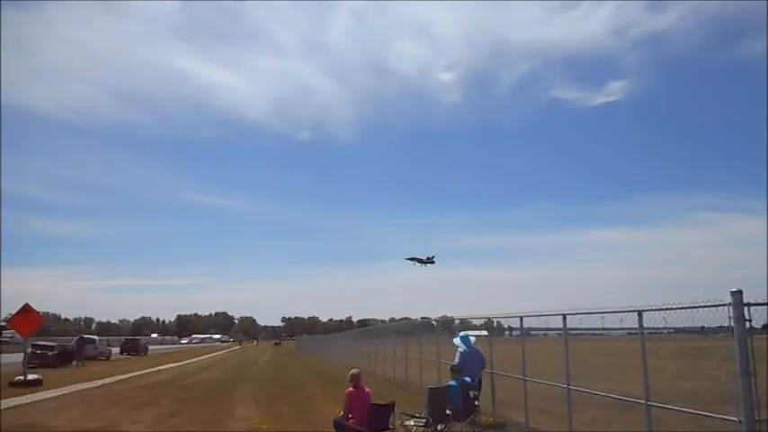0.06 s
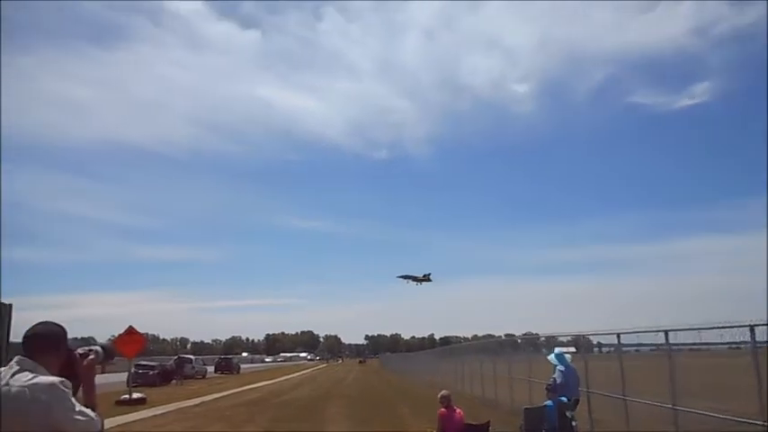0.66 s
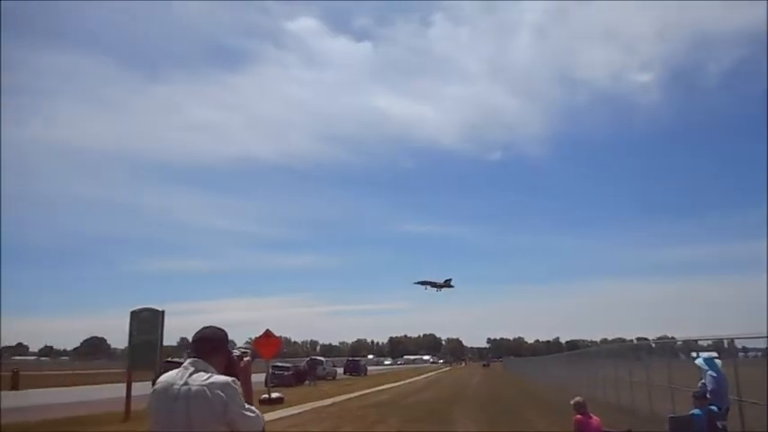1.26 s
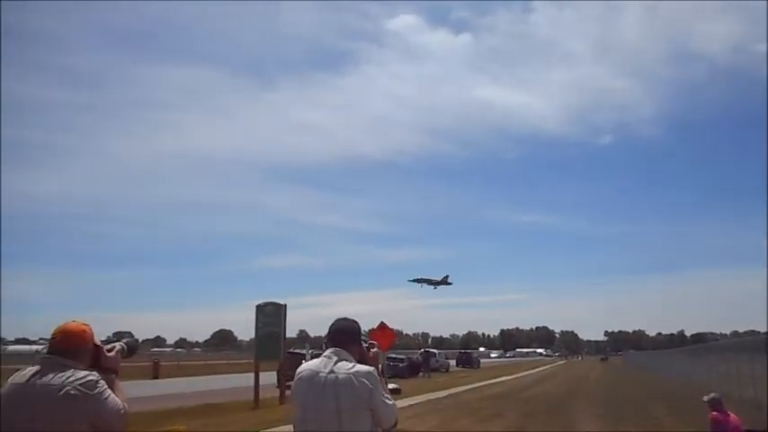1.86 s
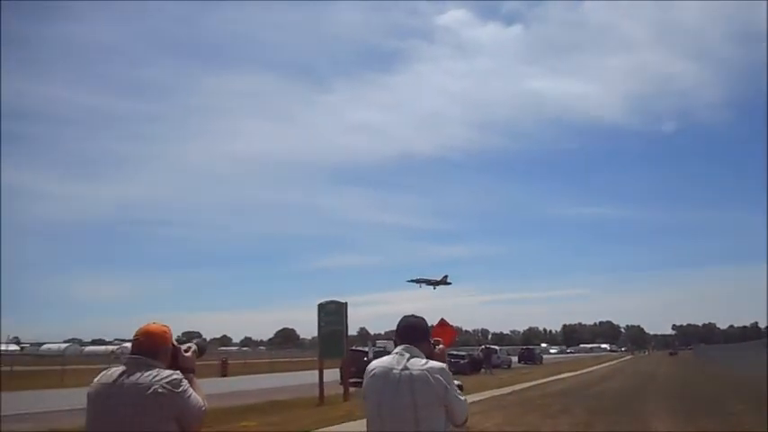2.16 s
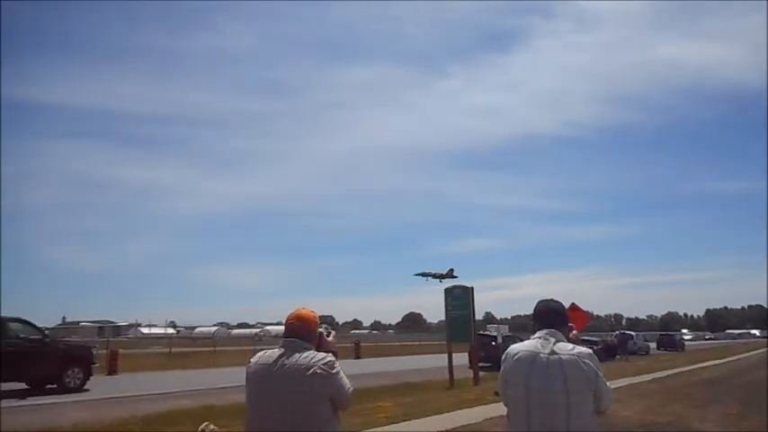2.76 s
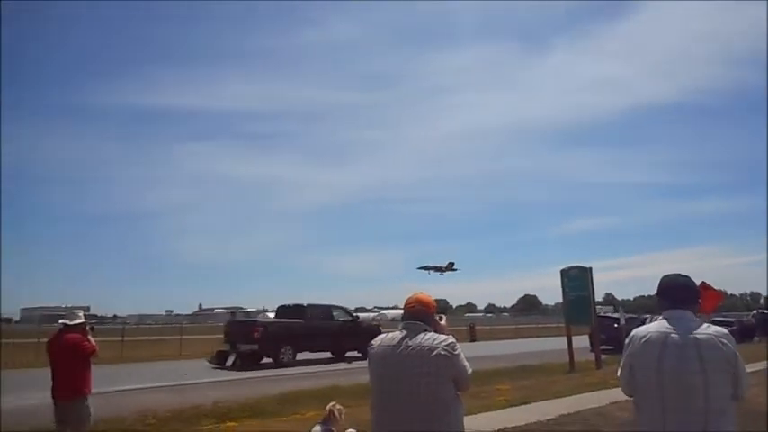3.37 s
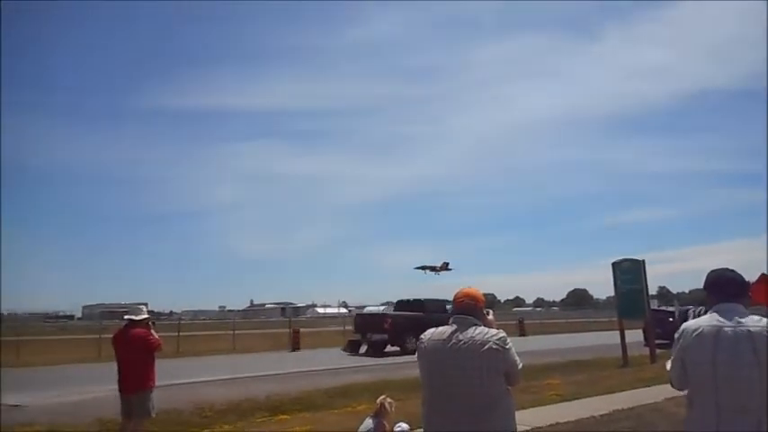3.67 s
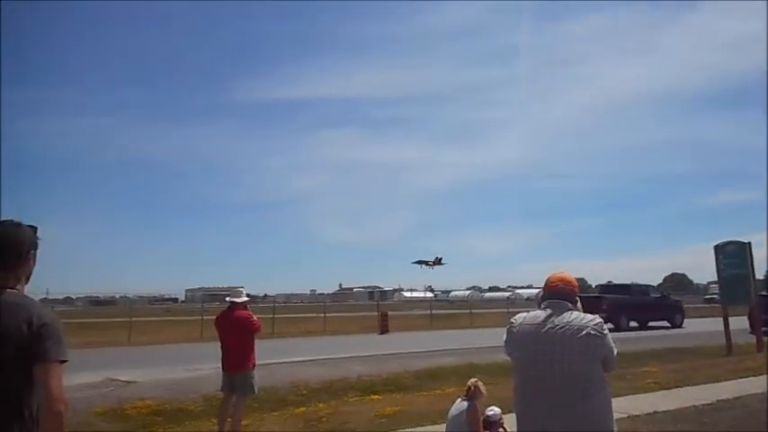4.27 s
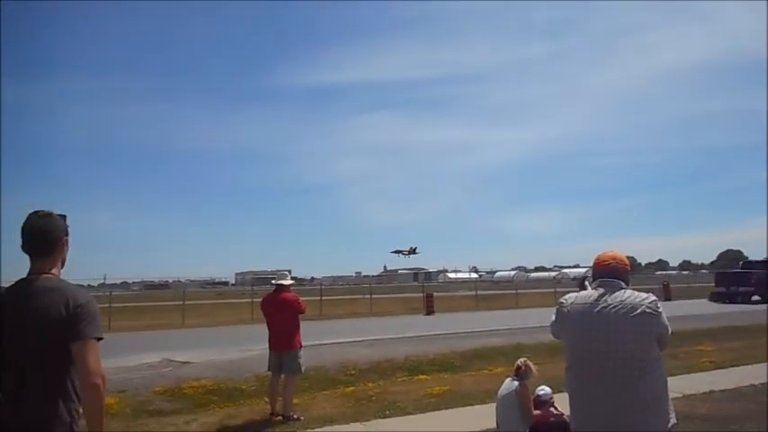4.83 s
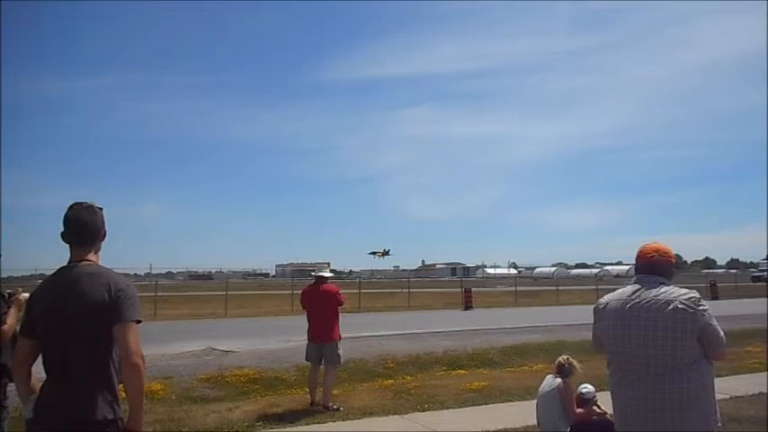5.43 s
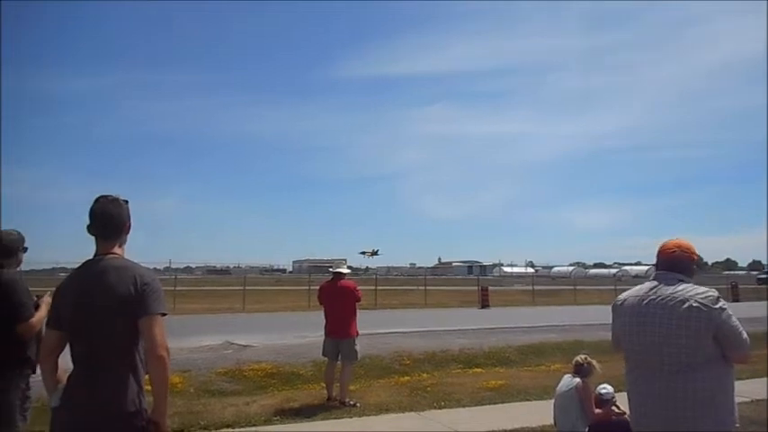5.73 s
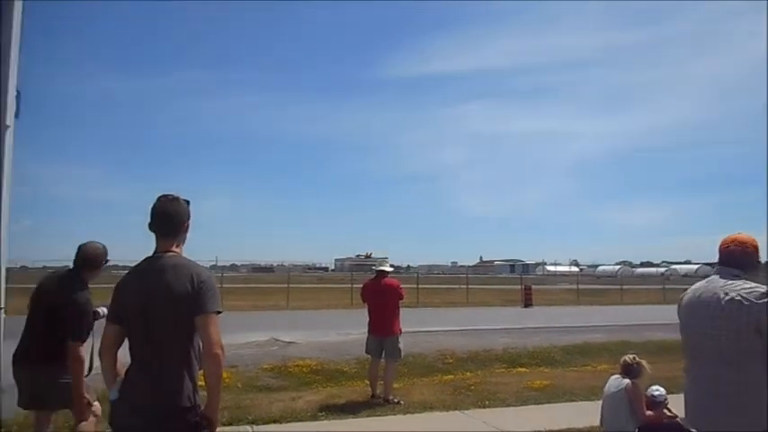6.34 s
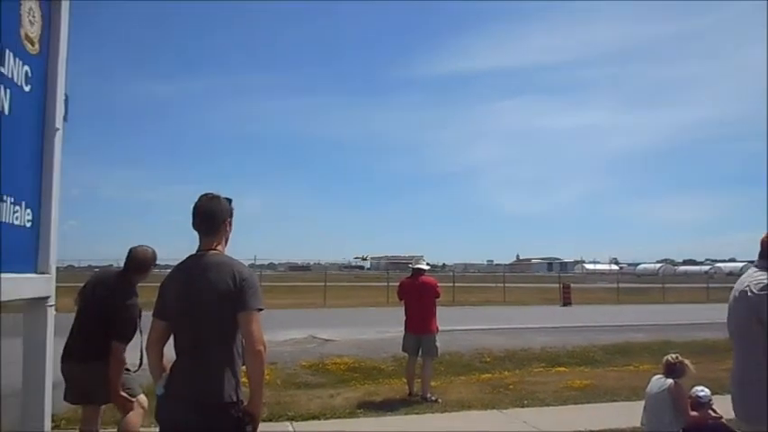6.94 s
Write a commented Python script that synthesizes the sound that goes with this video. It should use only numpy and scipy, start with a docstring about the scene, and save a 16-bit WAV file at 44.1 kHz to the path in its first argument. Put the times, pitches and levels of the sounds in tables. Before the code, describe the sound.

Heard outdoors through a small camera microphone, a fighter jet approaches low over an airfield with a thin rising whine and a growing, wavering roar. The roar stays loud as it goes by, joined by swells of low rumble and a short high whistle. It takes on a rising, sweeping whoosh and softens slightly as the jet draws away. Occasional soft wind thumps touch the microphone.

```python
"""A fighter jet flies low along an airfield, heard from the grass with a small camera.
First its compressor whines, climbing as it spools up. The exhaust's mixing noise swells to a roar,
fluttering in turbulent air; the jet is abeam at 2.6 s. A low rumble swells, the turbine whistles
briefly, and the ground echo sweeps a comb upward through the roar as the jet draws away.
Throughout, a light breeze bumps the microphone now and then."""
import sys
import numpy as np
from scipy.fft import rfft, irfft, next_fast_len
from scipy.io import wavfile
from scipy.ndimage import map_coordinates

SR = 44100
rng = np.random.default_rng(int(sys.argv[2]) if len(sys.argv) > 2 else 0)


def waveform_to_disk(signal):
    """Save audio, clipped to [-1, 1], as 16-bit WAV at the path in sys.argv[1]."""
    frames = np.transpose(np.atleast_2d(signal))
    scaled = np.clip(frames, -1, 1) * 32767
    samples = np.round(scaled).astype(np.int16)
    wavfile.write(sys.argv[1], SR, samples)


N = 308700

# camera hiss: (frequency [Hz], density [dB])
SELF_NOISE_SPECTRUM = [(1000, -1), (5000, -0.5), (8000, -7.5), (9500, -13.5), (10300, -26)]
# microphone port peaks and notches: (centre [Hz], width [Hz], gain [dB])
PORT_RESONANCES = [(347.5, 17, 5), (395, 17, 1.5), (478.3, 43, 4.5), (644, 20, 4), (694, 11, -8),
                   (783, 99, 1.5), (995, 7.5, 6.5), (1123, 82, -2), (1268, 71, 2.5), (1610, 120, 2),
                   (1753, 130, -3), (2570, 120, -4.5), (3033, 260, 2.5), (3443, 150, -3.5), (4080, 400, 3),
                   (4585, 280, -6), (5150, 360, 0.5)]
# wind rumble: (frequency [Hz], density [dB])
BREEZE_SPECTRUM = [(20, 0.5), (70, 1), (130, -6.5), (300, -25), (1000, -76.5)]
# gusts: (time [s], gain [dB], half length [s])
BREEZE_GUSTS = [(1.45, 4, 0.072), (4.35, 11, .09), (6.63, 6, 0.17)]
# single eddies on the diaphragm: (time [s], peak [dB], pitch [Hz])
BREEZE_BUMPS = [(0.741, -47, 190), (1.108, -34.5, 220), (2.672, -40, 119.4), (3.061, -34, 210),
                (3.562, -29.5, 250), (4.264, -37, 90), (4.296, -26.5, 109), (4.344, -32, 120),
                (4.358, -30, 151), (4.386, -35, 110), (4.441, -36, 170), (5.768, -22.5, 290),
                (6.571, -28, 340), (6.579, -37, 70), (6.634, -34, 170)]
# low rumble swells: (time [s], gain [dB], half length [s])
RUMBLE_SWELLS = [(3.3, 17, 0.32), (5.75, 13.6, 0.63), (6.9, 7.5, 0.17)]
# compressor whine, beamed forwards: (time [s], level [dB])
COMPRESSOR_LEVEL = [(0, -60), (.2, -57), (.35, -68), (.8, -70), (1.5, -51.5), (1.9, -60.5), (4, -81.5),
                    (7, -99)]
# reflection off grass: (frequency [Hz], gain [dB], phase lag [rad])
GRASS_REFLECTION = [(200, 1, -.45), (700, 0, -.4), (1500, 0, -.25), (2100, -.5, .55), (2800, -6, .6),
                    (3800, -15, 1.3), (8000, -30, 1.5)]
# exhaust noise before band levelling: (frequency [Hz], density [dB])
PLUME_SPECTRUM = [(40, -43), (120, -23), (220, -23), (420, -12.5), (590, -4.5), (900, -2), (1400, 2.5),
                  (2100, -1.5), (3200, -7), (4800, -22.5), (6500, -31), (7400, -42.5), (8200, -59),
                  (10000, -80.5)]
# base level of the arriving roar: (time [s], level [dB])
ROAR_LEVEL = [(-0.0, -35), (0.27, -32), (0.66, -31), (0.99, -33), (1.41, -25.5), (2.36, -20.5), (3.73, -23),
              (3.97, -19.5), (5.19, -21), (5.87, -19.5), (6.26, -24), (6.68, -29.5), (7.0, -25)]
# eddy sizes, as rumble, body, howl, rasp, hiss, fizz: (low edge [Hz], high edge [Hz])
EDDY_BANDS = [(280, 480), (560, 1050), (1180, 1620), (1760, 2450), (2800, 4400), (5000, 7500)]
# beam per eddy band: (gain abeam [dB], extra gain tail on [dB])
EDDY_BEAMS = [(-24, -3), (-5.5, -0.2), (-3.0, 0.5), (-5, -2.5), (-9, -3.5), (-21.5, -3.5)]
# turbulent air focusing or shading the roar: (time [s], gain [dB], half length [s], centre [Hz])
AIR_SURGES = [(0.154, 11, 0.026, 2900), (0.258, 6, 0.039, 1060.0), (0.505, 5.5, 0.027, 1710.0),
              (0.658, 7, 0.17, 940.0), (1.278, 10.5, 0.08, 1040), (1.514, 7, 0.11, 4450),
              (1.566, 8.5, 0.1, 1110), (1.725, 8.5, 0.015, 1190.0), (1.838, 5.5, 0.14, 2260),
              (2.054, 4.3, 0.081, 960.0), (2.252, 5.5, 0.034, 2290), (2.384, 9, 0.017, 1130),
              (2.42, 5, 0.059, 2660), (2.577, -6, 0.1, 2670), (2.664, 6.5, 0.12, 4080),
              (2.932, 7, 0.061, 4200), (3.33, 3.8, 0.21, 1610), (3.414, 7.5, 0.069, 516),
              (3.633, 9.5, 0.31, 4510), (3.694, 8, 0.029, 4150), (4.116, 7, 0.04, 3980.0),
              (4.303, 3.5, 1, 405), (4.675, 6.5, 0.059, 940), (4.675, 10.5, 0.028, 4550.0),
              (4.876, 4, 0.083, 1250.0), (5.067, 6, 0.068, 4750), (5.229, 5.0, 0.25, 2000),
              (5.607, 5, 0.055, 1210.0), (5.96, 3.5, 0.27, 1350), (6.198, 5.5, 0.13, 3140),
              (6.94, 5.5, 0.439, 4080)]

ABEAM_S, PASS_S = 2.636, 2.67  # PASS_S: time to fly one closest distance


def amp(db):
    """Decibels to gain."""
    return 10 ** (np.asarray(db) / 20)


def unit(x):
    """Scale to rms 1."""
    return x / np.sqrt(np.mean(x ** 2) + 1e-20)


def seconds():
    """Time of each sample."""
    return np.arange(N) / SR


def envelope_db(rows):
    """(time, level) points joined per sample."""
    return np.interp(seconds(), *np.transpose(rows))


def swell(time_s, half_s):
    """Gaussian rise to 1 and back."""
    return np.exp(-np.minimum(((seconds() - time_s) / half_s) ** 2, 20))


def swells_db(rows):
    """Sum of (time, gain, half length) swells."""
    return sum(db * swell(time_s, half_s) for time_s, db, half_s in rows)


def wobble(rate_hz):
    """Smooth random curve, rate_hz knots a second."""
    knots = rng.standard_normal(int(N * rate_hz / SR) + 4)
    return map_coordinates(knots, [np.arange(N) * rate_hz / SR])


def filtered(x, response):
    """Apply a frequency response."""
    size = next_fast_len(N + SR // 2)
    return irfft(rfft(x, size) * response(np.fft.rfftfreq(size, 1 / SR)), size)[:N]


def shaped(x, spectrum):
    """Filter by (frequency, dB) points joined on a log axis."""
    knots_hz, db = np.transpose(spectrum)
    return filtered(x, lambda hz: amp(np.interp(np.log(hz + 1), np.log(knots_hz + 1), db)))


def noise(spectrum):
    """Coloured noise, rms 1."""
    return unit(shaped(rng.standard_normal(N), spectrum))


def narrow_noise(hz, width_hz):
    """Noise around a steady or moving pitch, rms 1."""
    phase = 2 * np.pi * np.cumsum(hz * np.ones(N)) / SR
    return unit(wobble(width_hz) * np.cos(phase) + wobble(width_hz) * np.sin(phase))


def port_gain(hz):
    """Resonances of the microphone port."""
    return amp(sum(db * np.exp(-2 * ((hz - centre_hz) / width_hz) ** 2)
                   for centre_hz, width_hz, db in PORT_RESONANCES))


def breeze(base_db, uneven_db):
    """Faint gusty rumble; single eddies push and pull the diaphragm once."""
    out = noise(BREEZE_SPECTRUM) * amp(base_db + swells_db(BREEZE_GUSTS) + uneven_db * wobble(7.5))
    for time_s, peak_db, hz in BREEZE_BUMPS:
        phase = 2 * np.pi * hz * (seconds() - time_s)
        out += amp(peak_db) * phase * np.exp((1 - phase ** 2) / 2)
    return out


def field_rumble(base_db, pitch_hz):
    """Dull rumble that swells a few times once the jet has passed."""
    band = narrow_noise(pitch_hz, width_hz=115)
    return amp(base_db + swells_db(RUMBLE_SWELLS) + 1.4 * wobble(3.8)) * band


def blade_tone(hz, db, width_hz):
    """Tone smeared by the air into a wavering noise band."""
    return amp(db + 1.8 * wobble(12)) * narrow_noise(hz, width_hz)


def compressor(from_hz, to_hz, spool_s):
    """Intake whine: climbs as the engines spool up, fades as the nose passes."""
    hz = to_hz + (from_hz - to_hz) * np.exp(-seconds() / spool_s)
    return blade_tone(hz, envelope_db(COMPRESSOR_LEVEL), width_hz=750)


def turbine(peak_s, peak_db, pitch_hz, sag_hz_per_s=180, rise_db_per_s=44, fade_db_per_s=15):
    """Short sagging whistle, beamed backwards, as the nozzles turn to the listener."""
    since_s = seconds() - peak_s
    db = peak_db + np.minimum(rise_db_per_s * since_s, -fade_db_per_s * since_s)
    return blade_tone(pitch_hz - sag_hz_per_s * since_s, db, width_hz=220)


def flight():
    """Straight pass: distance [closest distances], aspect [-1 nose on, 1 tail on]."""
    travelled = (seconds() - ABEAM_S) / PASS_S
    distance = np.hypot(1, travelled)
    return distance, travelled / distance


def ground_echo(x, abeam_lag_ms, cleanest_s):
    """Bounce off the grass; its lag shrinks as the jet nears the horizon, sweeping a comb upward."""
    distance, _ = flight()
    lag_ms = abeam_lag_ms / distance ** 2
    strength = 0.16 + 0.48 * swell(cleanest_s, half_s=0.95)  # weak at steep angles
    grass_hz, gain_db, lag_rad = np.transpose(GRASS_REFLECTION)
    reflection = lambda hz: amp(np.interp(hz, grass_hz, gain_db))
    bounce = filtered(x, lambda hz: reflection(hz) * np.exp(-1j * np.interp(hz, grass_hz, lag_rad)))
    echo = map_coordinates(bounce, [np.arange(N) - lag_ms * SR / 1000])
    # both paths share the power where the grass reflects
    shared = filtered(x, lambda hz: reflection(hz) ** 2)
    direct_gain = 1 / np.sqrt(1 + strength ** 2)
    return x - (1 - direct_gain) * shared + direct_gain * strength * echo


def air_loss_db(hz, distance):
    """Absorption beyond the closest distance; grows as a power of frequency."""
    return 1.87 * (hz / 1000) ** 1.276 * (distance - 1)


def air_surge_db(hz, half_width_oct=0.68):
    """Turbulent air briefly focuses or shades the sound near hz."""
    return sum(db * swell(time_s, half_s) * np.exp(-(np.log2(hz / centre_hz) / half_width_oct) ** 2)
               for time_s, db, half_s, centre_hz in AIR_SURGES)


def mixing_noise(shocks_per_s, shock_db):
    """Turbulent mixing noise with a crackle of small shocks."""
    shocks = (rng.random(N) < shocks_per_s / SR) * rng.random(N)
    return unit(rng.standard_normal(N) + amp(shock_db) * unit(shocks))


def exhaust(common_flutter_db, band_flutter_db):
    """Big eddies rumble, small ones hiss; each size has its own beam, air loss, surges and flutter."""
    distance, aspect = flight()
    roar_db = envelope_db(ROAR_LEVEL) + common_flutter_db * wobble(70)
    plume = shaped(mixing_noise(shocks_per_s=700, shock_db=-11), PLUME_SPECTRUM)
    out = np.zeros(N)
    for k, ((low_hz, high_hz), (abeam_db, tail_db)) in enumerate(zip(EDDY_BANDS, EDDY_BEAMS)):
        centre_hz = np.sqrt(low_hz * high_hz)
        share = np.repeat(np.arange(len(EDDY_BANDS)) == k, 2)  # neighbouring bands crossfade
        band = filtered(plume, lambda hz: np.interp(hz, np.ravel(EDDY_BANDS), share))
        through_port = filtered(plume, lambda hz: port_gain(hz) * (hz > low_hz) * (hz < high_hz))
        beam_db = abeam_db + tail_db * aspect
        air_db = air_surge_db(centre_hz) - air_loss_db(centre_hz, distance)
        flutter_db = band_flutter_db * wobble(30)
        out += band / np.std(through_port) * amp(roar_db + beam_db + air_db + flutter_db)
    return out


def scene():
    """Jet over grass, breeze at the microphone; mono."""
    roar = exhaust(common_flutter_db=0.94, band_flutter_db=0.97)
    mix = ground_echo(roar, abeam_lag_ms=5.585, cleanest_s=5.15)
    mix += compressor(from_hz=5380, to_hz=7050, spool_s=1.1)
    mix += turbine(peak_s=4.58, peak_db=-45.5, pitch_hz=4500)
    mix += field_rumble(base_db=-65, pitch_hz=214)
    mix += breeze(base_db=-61.5, uneven_db=3.5)
    return mix[None]


def record(dry):
    """Camera: port colour, faint electronic hiss, band limit."""
    picked_up = filtered(dry[0], port_gain) + amp(-66) * noise(SELF_NOISE_SPECTRUM)
    return filtered(picked_up, lambda hz: hz < 10400)[None]


dry = scene()
out = record(dry)
waveform_to_disk(out)
```